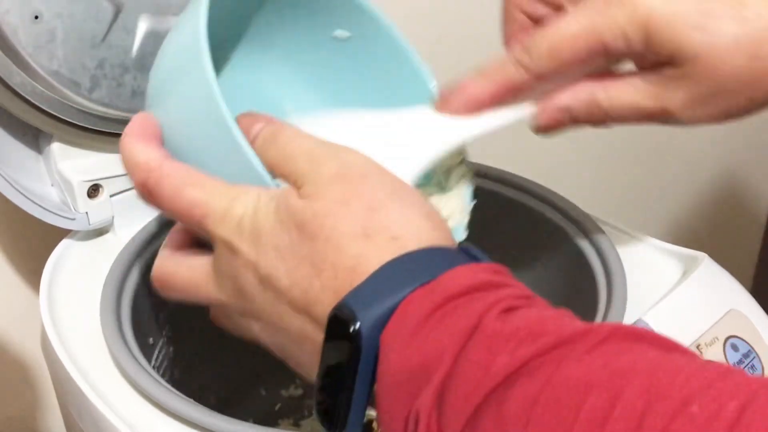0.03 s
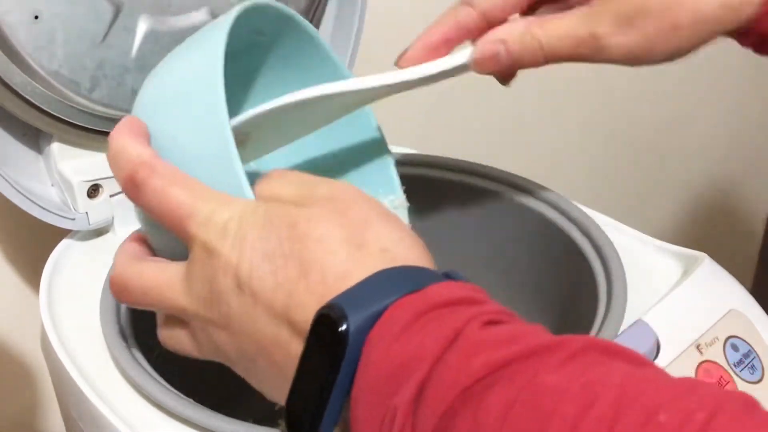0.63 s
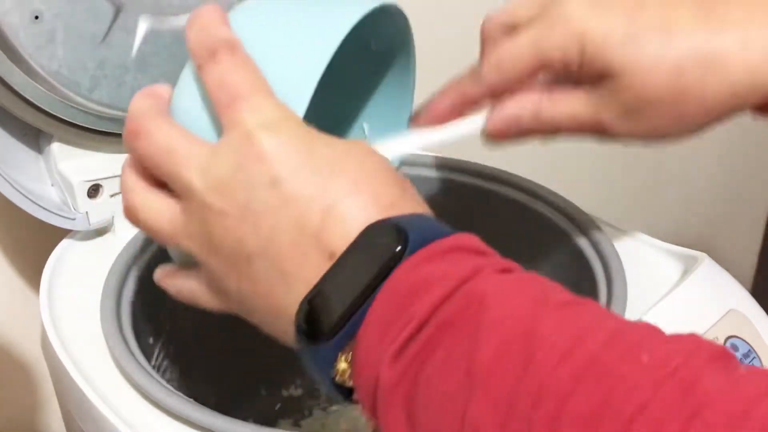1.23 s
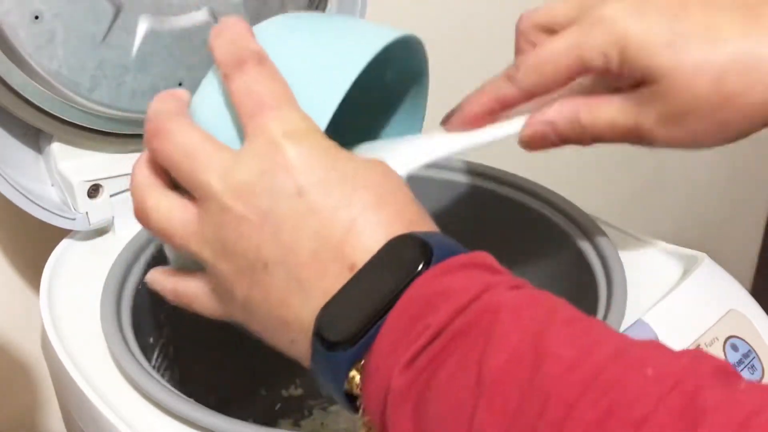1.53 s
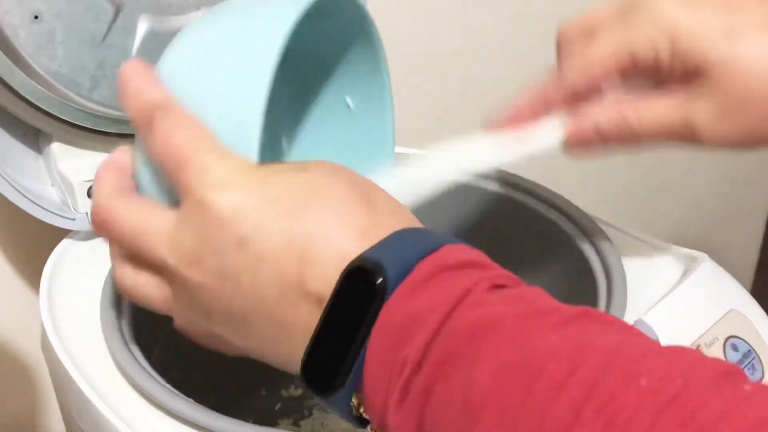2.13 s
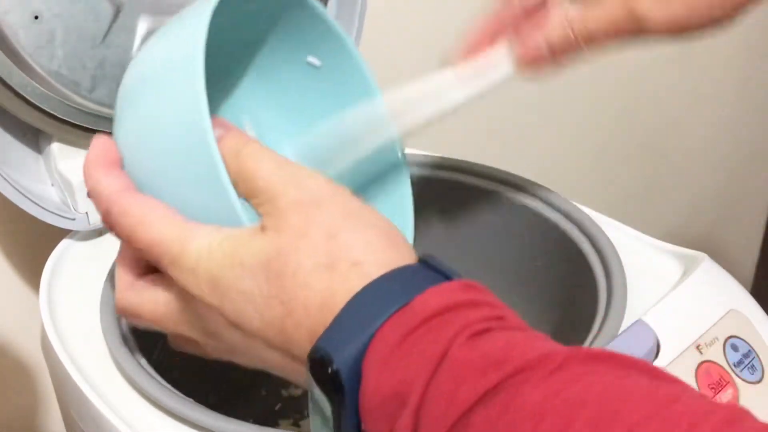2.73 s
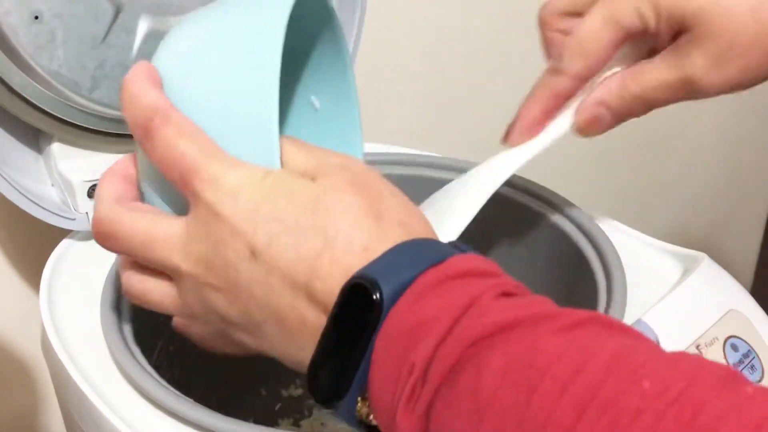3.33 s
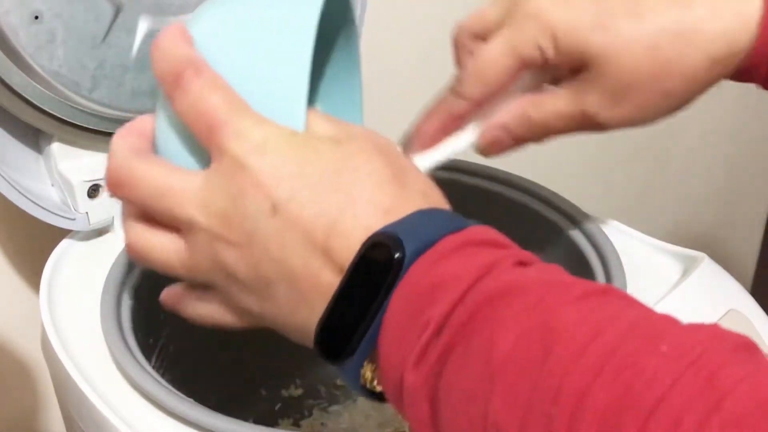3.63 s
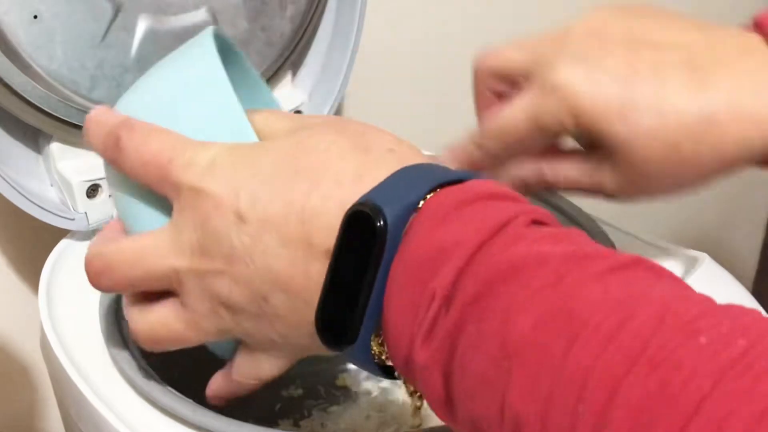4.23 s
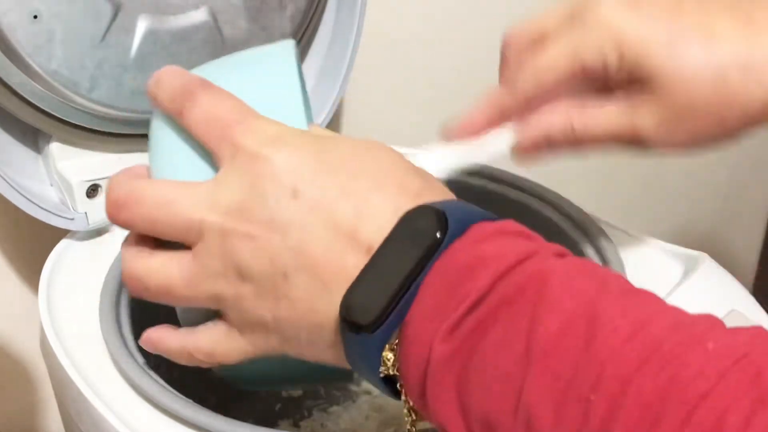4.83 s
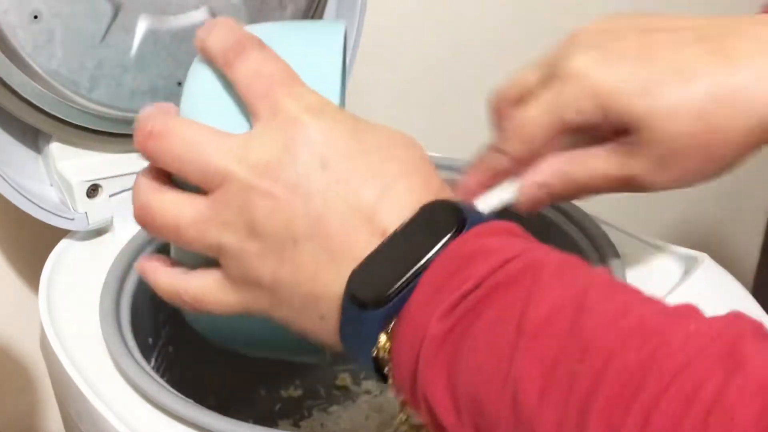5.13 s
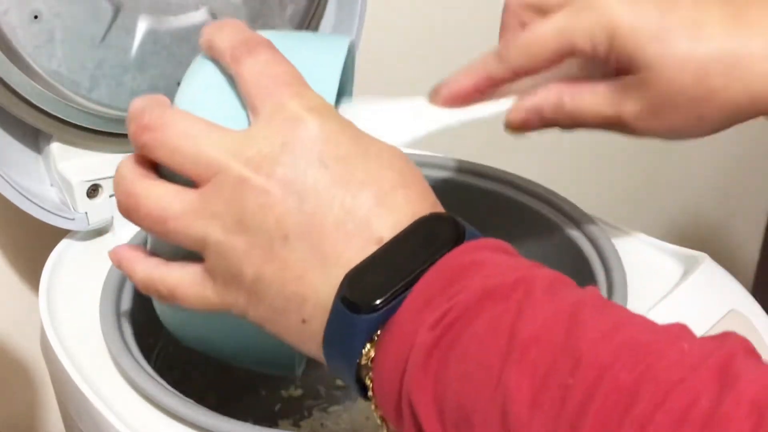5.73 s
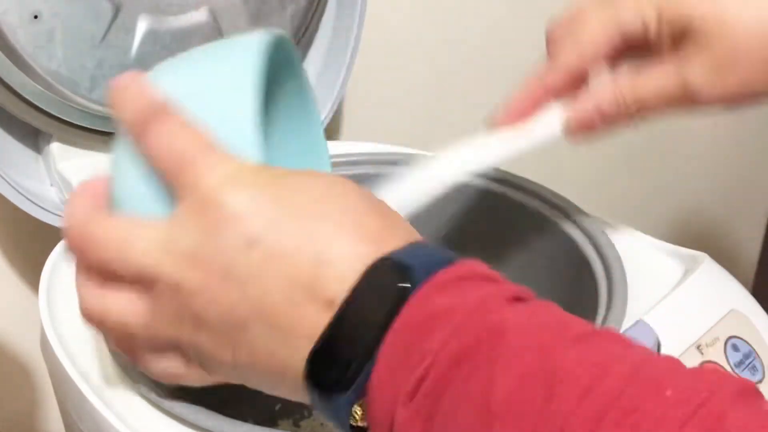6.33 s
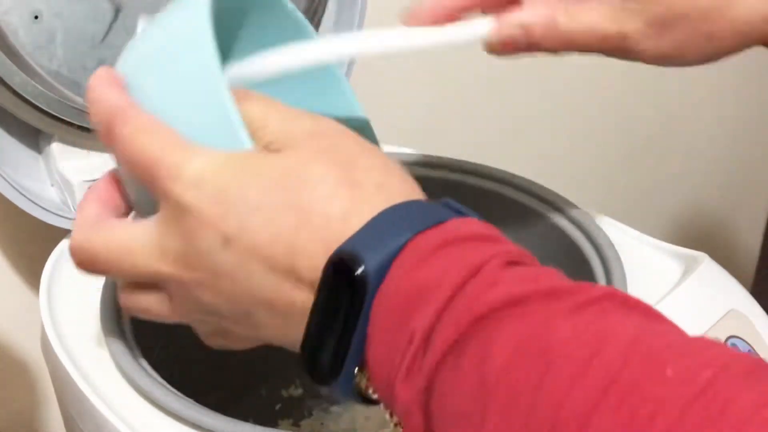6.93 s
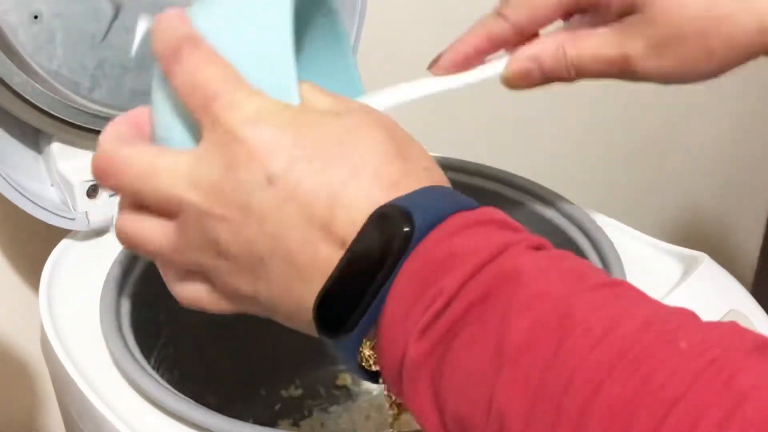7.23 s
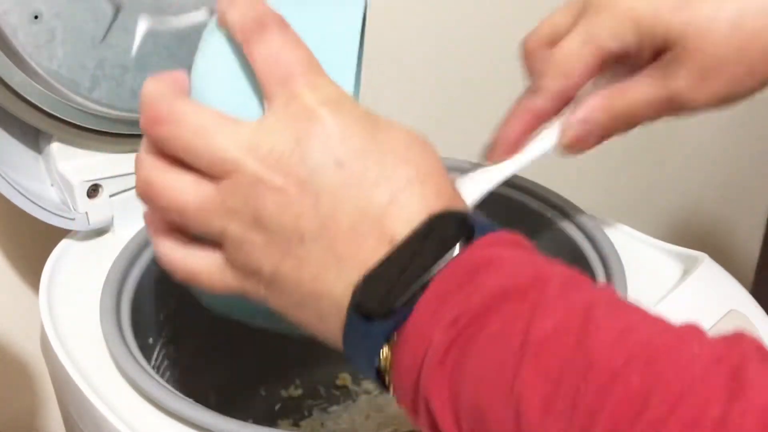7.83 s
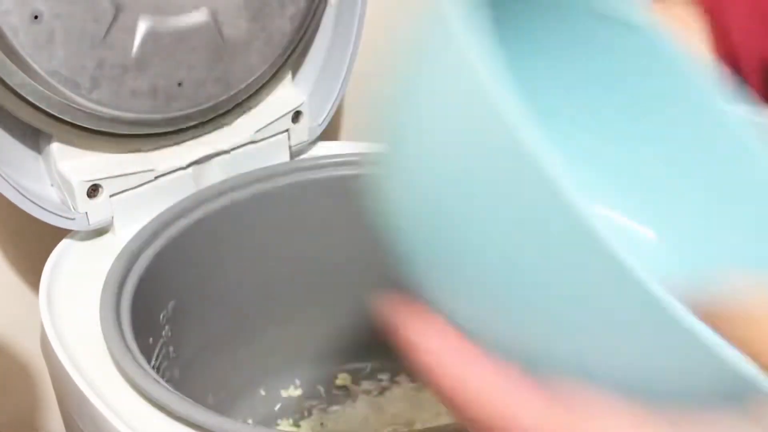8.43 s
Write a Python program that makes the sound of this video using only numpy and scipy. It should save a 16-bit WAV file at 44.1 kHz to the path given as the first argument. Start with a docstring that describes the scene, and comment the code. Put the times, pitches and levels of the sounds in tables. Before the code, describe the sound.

Damped, hollow clacks of a plastic paddle on a ceramic bowl repeat unevenly throughout, linked by soft, wet scraping and light ticks on the rim. A little metal charm jingles occasionally, and clumps of rice slide off and drop faintly into a rice cooker. A cushioned thump in the pot finishes it. The microphone is close, in a quiet small kitchen with a short echo.

```python
"""A small kitchen: a plastic paddle scrapes wet rice from a hand-held ceramic bowl into a rice cooker.
The paddle knocks, rubs and squeaks on the bowl, whose hollow answers near 1 kHz while the hand damps
its wall. Loosened grains hiss over the lip, and a small metal charm clinks in between.
A low thud underlies an early knock; later, clumps of rice and at last the paddle land in the pot."""
import sys
import numpy as np
from scipy import signal
from scipy.fft import rfft, irfft, next_fast_len
from scipy.io import wavfile
from scipy.ndimage import uniform_filter1d, map_coordinates

SR = 44100
rng = np.random.default_rng(int(sys.argv[2]) if len(sys.argv) > 2 else 0)


def unload_audio(sound):
    """Save the sound as a 16-bit wav file, at the path given as the first command line argument."""
    columns = np.transpose(np.atleast_2d(sound))
    # keep every value between -1 and 1, then stretch to whole-number steps
    steps = np.round(np.clip(columns, -1, 1) * 32767)
    wavfile.write(sys.argv[1], SR, steps.astype(np.int16))


N = 379260
RING_TIME = np.arange(SR // 2) / SR


def amp(db):
    """Decibels to gain."""
    return 10 ** (np.asarray(db) / 20)


def unit(x):
    """Scale to rms 1."""
    return x / np.sqrt(np.mean(x ** 2) + 1e-20)


def unit_hit(x):
    """Scale a hit to rms 1 over its first 15 ms."""
    return x / np.sqrt(np.mean(x[:int(.015 * SR)] ** 2) + 1e-20)


def along(points, hz):
    """Read a curve of (frequency, value) points on a log frequency axis."""
    f, v = np.transpose(points)
    return np.interp(np.log(hz + 1), np.log(f + 1), v)


def add(track, s, sound):
    """Mix a sound into a track at s seconds."""
    part = track[max(round(s * SR), 0):][:len(sound)]
    part += sound[:len(part)]


def filtered(x, response):
    """Filter x by a response given as a function of frequency."""
    size = next_fast_len(len(x) + SR // 4)
    return irfft(rfft(x, size) * response(np.fft.rfftfreq(size, 1 / SR)), size)[:len(x)]


def coloured(x, spectrum, size=1024):
    """Minimum-phase EQ, so that attacks stay sharp."""
    gain = amp(along(spectrum, np.fft.rfftfreq(size, 1 / SR)))
    cepstrum = irfft(np.log(gain))
    cepstrum[1:size // 2] *= 2
    cepstrum[size // 2 + 1:] = 0
    impulse = irfft(np.exp(rfft(cepstrum)))
    return signal.fftconvolve(x, impulse)[:len(x)]


def wobble(rate):
    """A smooth random curve, rate knots a second."""
    knots = rng.standard_normal(int(N * rate / SR) + 4)
    return map_coordinates(knots, [np.arange(N) * rate / SR])


def gesture(start, end, attack_s=0.016, release_s=0.023):
    """The samples of one movement, its progress from 0 to 1, and its envelope."""
    t = np.arange(N) / SR
    span = (t >= start) & (t < end)
    t = t[span]
    envelope = np.minimum((t - start) / attack_s, 1) * np.minimum((end - t) / release_s, 1)
    return span, (t - start) / (end - start), envelope


def ring(modes, attack_s, scatter_db, detune):
    """Damped modes of alternating sign; each place of contact shifts their strengths and pitches."""
    hz, db, t60 = np.transpose(modes)[:, :, None]
    t = RING_TIME[:int(1.3 * t60.max() * SR)]
    strength, shift = rng.standard_normal((2, len(modes), 1))
    sign = (-1) ** np.arange(len(modes))[:, None]
    waves = sign * np.sin(2 * np.pi * hz * (1 + detune * shift) * t)
    decays = amp(db + scatter_db * strength - 60 * t / t60)
    return unit_hit(np.sum(decays * waves, axis=0) * (1 - np.exp(-t / attack_s)))


def focused(modes, centre_hz, octaves):
    """The place of contact favours the modes near one pitch; the rest drop by up to 10 dB."""
    return [(hz, db - min(6 * (np.log2(hz / centre_hz) / octaves) ** 2, 10), t60)
            for hz, db, t60 in modes]


def burst(t60):
    """White noise that dies by 60 dB in t60 seconds."""
    t = RING_TIME[:SR // 10]
    return amp(-60 * t / t60) * rng.standard_normal(len(t))


def clack(hz, t60):
    """A dry, unpitched burst around one frequency."""
    band = [(hz / 4, -26), (hz / 2, -5), (hz, 0), (hz * 1.5, -3), (hz * 3, -26)]
    return unit_hit(coloured(burst(t60), band))


def grains(rate, spread_db, smooth):
    """Tiny random slips of uneven size, rate a second, over a smooth share of noise."""
    slips = (rng.random(N) < rate / SR) * rng.standard_normal(N)
    slips *= amp(spread_db * rng.standard_normal(N))
    return unit(unit(slips) + smooth * rng.standard_normal(N))


# Room tone spectrum: (frequency [Hz], level [dB])
AIR_EQ = [(20, -33.5), (45, -13), (75, -4), (130, -4), (300, -6), (1000, -10), (3000, -14.5), (8000, -24),
          (16000, -35.5)]


def room_tone():
    """The kitchen's steady air, a bed of dark noise."""
    return unit(coloured(rng.standard_normal(N), AIR_EQ))


# Kitchen reverb time: (frequency [Hz], t60 [s])
KITCHEN_DECAY = [(200, 0.23), (1000, 0.34), (4000, 0.34), (9000, 0.3), (16000, 0.22)]


def kitchen_reverb(x, build_s=0.005):
    """A short, diffuse tail; bowl and arms keep moving, so it differs every quarter second."""
    out, step = np.zeros(N), SR // 4
    for i in range(0, N, step):
        hz, t, noise = signal.stft(rng.standard_normal(SR // 2), SR, nperseg=256)
        decay = amp(-60 * t / along(KITCHEN_DECAY, hz)[:, None])
        tail = signal.istft(noise * decay, SR, nperseg=256)[1]
        tail *= 1 - np.exp(-np.arange(len(tail)) / SR / build_s)  # builds as more walls are reached
        add(out, i / SR, signal.fftconvolve(x[i:i + step], tail / np.linalg.norm(tail)))
    return out


# Low modes of the cooker pot: (frequency [Hz], level [dB], t60 [s])
POT_MODES = [(149, -4.5, 0.048), (318, -4, 0.05), (401, -2, 0.099), (560, -3.5, 0.027)]
# Dull low thuds: one under an early paddle knock, then clumps and finally the paddle landing
# in the pot: (time [s], level [dB])
LOW_THUDS = [(.316, -49.5), (1.166, -58.5), (1.376, -56), (4.588, -58), (5.559, -63), (5.755, -46.5),
             (6.113, -48.5), (8.482, -45.5), (8.505, -33), (8.522, -39), (8.555, -47), (8.589, -50)]


def low_thuds():
    """A soft, cushioned thud is a dull rustle over the low modes of the pot."""
    out = np.zeros(N)
    for s, db in LOW_THUDS:
        add(out, s, amp(db - 5.5) * clack(1100, t60=.07))
        add(out, s, amp(db) * ring(POT_MODES, attack_s=.005, scatter_db=1.5, detune=.01))
    return out


# Bright spectrum of wet rice: (frequency [Hz], level [dB])
RICE_EQ = [(100, -20.5), (1500, -22), (3000, 2.5), (4300, -0.5), (6500, 1.5), (9000, -4.5), (13000, -5.5),
           (16000, -9)]


def rice_hiss(slips, patchy_db):
    """A hiss whose colour shifts as the contact wanders over wet grains."""
    spectrogram = signal.stft(coloured(slips, RICE_EQ), nperseg=256)[2]
    patches = uniform_filter1d(rng.standard_normal(spectrogram.shape), size=3, axis=0)
    patches = unit(uniform_filter1d(patches, size=16, axis=1))
    return unit(signal.istft(spectrogram * amp(patchy_db * patches), nperseg=256)[1][:N])


# Loosened rice slides off: (start [s], end [s], final level [dB])
RICE_SLIDES = [(1.054, 1.212, -35), (1.43, 1.53, -41), (3.417, 3.467, -43), (8.23, 8.568, -39)]


def rice_slides(swell_db=23):
    """Wet grains gather speed over the lip: the hiss swells until the clump is gone."""
    hiss = rice_hiss(grains(rate=2500, spread_db=3, smooth=1), patchy_db=3)
    out = np.zeros(N)
    for start, end, db in RICE_SLIDES:
        span, progress, envelope = gesture(start, end)
        out[span] += envelope * amp(db - swell_db * (1 - progress)) * hiss[span]
    return out


# Snap of a hard contact: (frequency [Hz], level [dB])
SNAP_EQ = [(30, -55), (120, -30), (350, -1.5), (600, -4), (1200, -11.5), (2500, -7), (4400, 6.5),
           (5100, -0.5), (6400, 2.5), (9000, -4.5), (13000, -8.5), (16000, -13.5)]
# Rattle behind the snap: (frequency [Hz], level [dB])
RATTLE_EQ = [(30, -38.5), (150, -27), (350, 0), (600, -8), (1200, -3), (3000, 0), (7000, -2.5),
             (10000, -11), (16000, -31.5)]


def crack(t60, rattle_db, rattle_t60):
    """The bright snap of a hard contact, with its duller rattle between bowl and pot."""
    snap = coloured(burst(t60), SNAP_EQ)
    rattle = amp(rattle_db) * coloured(burst(rattle_t60), RATTLE_EQ)
    return unit_hit(snap + rattle)


# Modes of the metal charm: (frequency [Hz], level [dB], t60 [s])
CHARM_MODES = [(3770, -2.5, 0.3), (4163, 6, 0.042), (3794, -6.5, 0.062), (4190, -9, .15),
               (4365, -10.5, 0.054), (4860, -11, 0.028), (6100, -9.5, .05), (7170, -21, 0.18),
               (8300, -23, 0.12), (9625, -21, .1), (11800, -31, 0.18), (13180, -32, 0.14)]
# Charm contacts: (time [s], level [dB])
CHARM_HITS = [(1.3683, -28), (1.4685, -38.5), (1.6265, -38), (1.6551, -44), (1.904, -47.5), (2.0192, -40),
              (3.3396, -48), (3.6811, -41.5), (5.1298, -41.5), (5.184, -45), (5.3581, -44), (5.43, -43),
              (6.218, -39), (7.436, -32), (7.486, -42.5), (7.8707, -25.5), (7.8855, -38)]


def charm_clinks():
    """The charm ticks, clatters briefly and rings on at its own pitches."""
    out = np.zeros(N)
    for s, db in CHARM_HITS:
        tone = ring(CHARM_MODES, attack_s=.0004, scatter_db=1.5, detune=.0002)
        clatter = coloured(clack(4100, t60=.035), [(3000, -20), (3700, 0), (4400, 0), (5400, -16)])
        tick = coloured(crack(t60=0.025, rattle_db=0, rattle_t60=0.066), [(2500, -11), (4400, -3)])
        add(out, s, amp(db + 4.5) * tone)
        add(out, s, amp(db + 4.5) * clatter)
        add(out, s, amp(db + 2) * tick)
    return out


# The paddle's edge half sings: (start [s], end [s], start pitch [Hz], end pitch [Hz], level [dB])
SQUEAK_GLIDES = [(.36, 0.466, 1300, 1920, -38), (4.135, 4.198, 1970, 2100, -41),
                 (4.165, 4.221, 3130, 2890, -39.5), (4.16, 4.24, 4310, 4090, -38),
                 (4.68, 4.85, 2270, 2240, -53.5), (6.61, 6.701, 776, 997, -42),
                 (6.72, 6.894, 1763, 1960, -41), (7.18, 7.367, 3060, 2790, -52)]


def paddle_squeaks():
    """The edge catches, and nearly regular slips make a rough, gliding tone."""
    out = np.zeros(N)
    flutter = wobble(150) + 1j * wobble(150)
    for start, end, start_hz, end_hz, db in SQUEAK_GLIDES:
        slips = flutter[int(start * SR):int(end * SR)]
        phase = 2 * np.pi * np.cumsum(np.linspace(start_hz, end_hz, len(slips))) / SR
        add(out, start, amp(db) * np.hanning(len(slips)) * np.real(slips * np.exp(1j * phase)))
    return out


# Modes of the ceramic wall: (frequency [Hz], level [dB], t60 [s])
WALL_MODES = [(1268, -1.5, 0.014), (1480, -4.5, 0.023), (1699, 0.5, 0.022), (1806, -13.5, 0.029),
              (2280, -3, 0.022), (2697, -6.5, 0.01), (2685, -2, 0.028), (3246, -2, 0.03)]


def wall_ring(hz):
    """The hand-damped wall rings briefly, favouring the modes near hz."""
    return ring(focused(WALL_MODES, hz, octaves=.6), attack_s=.0008, scatter_db=3, detune=.03)


# Modes of the bowl's hollow: (frequency [Hz], level [dB], t60 [s])
HOLLOW_MODES = [(384, -20, 0.048), (809, 3, 0.022), (972.4, 0.5, 0.046), (1038, -10.5, 0.023)]


def hollow_ring(place_hz=None):
    """The hollow answers with a softer attack, coloured by the struck place if one is given."""
    modes = HOLLOW_MODES
    if place_hz is not None:
        # higher places lie further from the hand and ring longer
        stretch = (place_hz / HOLLOW_MODES[2][0]) ** 1.8
        modes = [(hz, db, t60 * stretch) for hz, db, t60 in focused(modes, place_hz, octaves=0.23)]
    return ring(modes, attack_s=.0025, scatter_db=1, detune=.008)


# The paddle grazes the rim: (time [s], level [dB])
RIM_GRAZES = [(1.7155, -36.5), (2.205, -47), (2.731, -40.5), (2.811, -43.5), (3.8177, -42), (4.3038, -38),
              (5.3107, -42.5), (5.6348, -44.5), (6.3095, -34.5), (6.348, -36.5), (6.4449, -44),
              (6.465, -43.5), (6.9257, -49.5), (7.6022, -36.5), (8.0112, -37.5), (8.161, -39),
              (8.2077, -42.5)]


def rim_ticks(hz=2930):
    """A graze on the rim is a dry, high clack that hardly wakes the bowl."""
    out = np.zeros(N)
    for s, db in RIM_GRAZES:
        add(out, s, amp(db) * clack(hz, t60=0.028))
        add(out, s, amp(db - 8) * wall_ring(hz))
        add(out, s, amp(db - 17) * hollow_ring())
        add(out, s, amp(db - 5) * crack(t60=0.028, rattle_db=-12, rattle_t60=0.026))
    return out


# Resonances of the rubbed bowl: (frequency [Hz], width [Hz], level [dB])
RUB_RESONANCES = [(820, 22, -3), (963, 51, 11.5), (1730, 71, -5)]


def bowl_rub(slips, detune=.035):
    """Friction drives the hollow, whose pitch wanders as the paddle moves."""
    def response(f):
        return sum((-1) ** k * amp(db) * 1j * f * width / (hz * hz - f * f + 1j * f * width)
                   for k, (hz, width, db) in enumerate(RUB_RESONANCES))
    rub = unit(filtered(slips, response))
    return map_coordinates(rub, [np.cumsum(1 + detune * wobble(22))], mode="mirror")


def gap_comb(x, delay_s, echo):
    """Sound bounces between paddle and wall; a changing gap makes the resonances glide."""
    n = np.arange(len(x))
    return unit(sum(echo ** k * np.interp(np.round(n - k * delay_s * SR), n, x) for k in range(4)))


# Midrange chafe of plastic on ceramic: (frequency [Hz], level [dB])
CHAFE_EQ = [(30, -34), (150, -25), (380, -8), (600, -7.5), (1200, -4), (1750, -0.5), (2500, -5),
            (3100, -9.5), (4300, -10.5), (7000, -38)]
# Paddle strokes: (start [s], end [s], level [dB], swell over the stroke [dB], depth [0 lip, 1 bottom])
PADDLE_STROKES = [(0, 0.124, -46, 1, 0.68), (0.314, 0.463, -44.5, 16, 0.51), (.47, 0.65, -58, -19, 0.64),
                  (0.671, 0.84, -47, 4.5, 0.54), (0.836, 1.059, -57, 4, .45), (1.216, 1.39, -55, -2, 0.22),
                  (1.626, 1.717, -46.5, -20, 0.055), (1.86, 1.949, -49, -3, 0.23),
                  (1.996, 2.106, -52, -6, 0.26), (2.307, 2.704, -45.5, -1, 0.62),
                  (2.873, 3.063, -50.5, 0.5, 0.58), (3.04, 3.351, -54.5, 0.5, 0.54),
                  (3.56, 3.769, -52.5, 5.5, 0.45), (3.968, 4.103, -45.5, 13.5, 0.68),
                  (4.128, 4.242, -41, 8, 0.37), (4.47, 4.805, -52, -12, 0.65),
                  (4.952, 5.24, -52.5, -12, 0.6), (5.412, 5.575, -53, -8, 0.18),
                  (5.758, 5.905, -55, -17, 0.067), (6.11, 6.277, -54.5, -10, 0.26),
                  (6.466, 6.592, -55.5, -10, 0.32), (6.631, 6.823, -47.5, 8.5, 0.58),
                  (7.036, 7.11, -40, -4, 0.56), (7.134, 7.397, -48.5, 1.5, 0.7),
                  (7.44, 7.55, -59.5, -1, 0.19), (7.707, 7.976, -55.5, -7.5, 0.22),
                  (8.036, 8.15, -52.5, -17, 0.5)]


def paddle_scrapes(lift_per_s=1.5):
    """The edge sticks and slips up towards the lip: the hollow gives way to the hiss of wet grains."""
    grit = amp(-4) * grains(rate=110, spread_db=1.5, smooth=0)  # single grains pop from under the edge
    rub = bowl_rub(grains(rate=1100, spread_db=0, smooth=0.42) + grit)
    chafe = unit(coloured(grains(rate=1500, spread_db=4.5, smooth=1) + grit, CHAFE_EQ))
    hiss = rice_hiss(grains(rate=2300, spread_db=-0.5, smooth=2.5) + grit, patchy_db=5)
    out = np.zeros(N)
    for start, end, db, swell_db, depth in PADDLE_STROKES:
        span, progress, envelope = gesture(start, end)
        travel = progress - .5
        below_half = depth - .5 - lift_per_s * (end - start) * travel
        gap, turn = rng.standard_normal(2)
        delay_s = .00105 * np.exp(.1 * gap + (.08 + .2 * turn) * travel)
        friction = gap_comb(chafe[span], delay_s, echo=.7)
        body = amp(-2.94 + 14.5 * below_half) * rub[span]
        sizzle = amp(-0.6 - 18 * below_half) * hiss[span]
        out[span] += envelope * amp(db + swell_db * travel) * (body + friction + sizzle)
    pressure_db, judder_db = 1.2 * wobble(14), 1.5 * wobble(60)
    return out * amp(pressure_db + judder_db)


# Paddle hits: (time [s], level [dB], edge [0 cushioned face, 1 bare edge], pitch of the place [Hz])
PADDLE_HITS = [(0.0264, -24.5, 0.3, 920), (0.2565, -25, 1, 880), (.3142, -12.5, 0.57, 810),
               (0.5368, -37.5, 0.27, 1000), (0.5957, -22.5, 0.44, 864), (1.2042, -27, .35, 945),
               (1.2828, -23, 0.09, 867), (1.61, -18.5, 0.92, 1000), (1.8444, -18, 0.4, 826),
               (2.2626, -18.5, 0.89, 1030), (2.2717, -20.5, 0.04, 1040), (2.4476, -27, 0.73, 800),
               (2.8509, -20.5, 0.36, 1086), (2.873, -23, 0.33, 1000), (3.0526, -9.5, 0.39, 1020),
               (3.541, -18, 0.46, 970), (3.9582, -21.5, 0.94, 974), (3.9771, -25, 0.61, 830),
               (4.2375, -24.5, 0.26, 940), (4.456, -19, 0.86, 960), (4.476, -18.5, 0.41, 1030),
               (4.6949, -42.5, 0, 1014), (4.9434, -17, 0.54, 990), (4.9606, -21, 0.32, 1020),
               (5.0297, -17.5, 0.3, 970), (5.3971, -20.5, 0.43, 954), (5.752, -27, 0.72, 850),
               (6.0617, -15, 0.49, 910), (6.1125, -14.5, 0.55, 1020), (6.1225, -18.5, 0.23, 1036),
               (6.7, -31, 0.42, 910), (6.8268, -25.5, 0.56, 880), (7.0192, -12.5, 0.21, 1050),
               (7.129, -17, 0.41, 960), (7.3644, -31, 0.035, 1010), (7.6854, -15, 0.49, 950),
               (8.031, -16.5, 0.95, 830)]


def paddle_knocks():
    """A hit is hollow, wall and crack; the flat face favours the hollow, the bare edge the other two."""
    out = np.zeros(N)
    for s, db, edge, place_hz in PADDLE_HITS:
        hollow = hollow_ring(place_hz)
        wall_hz = place_hz * (1.52 + 0.88 * edge)
        ringing = wall_ring(wall_hz)
        clacking = amp(-6.5) * clack(wall_hz, t60=0.011)[:len(ringing)]
        dryness = np.clip(edge ** 3, .1, .9)  # the edge makes the wall clack more than ring
        wall = np.sqrt(1 - dryness) * ringing + np.sqrt(dryness) * clacking
        snap = crack(t60=0.022, rattle_db=-14, rattle_t60=0.068)
        add(out, s, amp(db + .5 - 15.5 * edge) * hollow)
        add(out, s, amp(db - 15 + 15.5 * edge) * wall)
        add(out, s, amp(db - 28.5 + 25 * edge) * snap)
    return out


def scene():
    """Mono mix: bowl, charm and pot up close, with reverb and faint room tone behind them."""
    hits = paddle_knocks() + rim_ticks() + charm_clinks() + low_thuds()
    near = hits + paddle_scrapes() + rice_slides() + paddle_squeaks()
    air = amp(-64.5) * room_tone()
    return (near + amp(-12.5) * kitchen_reverb(near) + air)[None]


def record(dry, low_cut_hz=38, high_cut_hz=16000):
    """Roll off the deepest bass and cut the extreme top steeply."""
    passed = signal.sosfilt(signal.butter(2, low_cut_hz, "highpass", fs=SR, output="sos"), dry)
    return np.array([filtered(x, lambda hz: 1 / (1 + (hz / high_cut_hz) ** 120)) for x in passed])


dry = scene()
out = record(dry)
unload_audio(out)
```